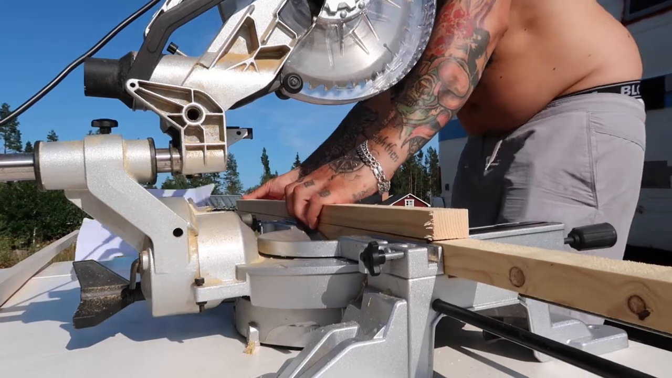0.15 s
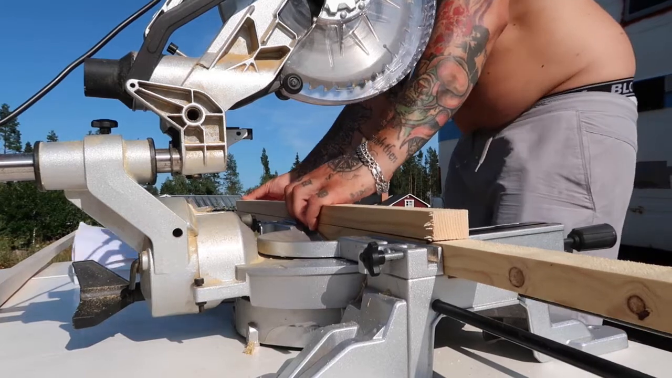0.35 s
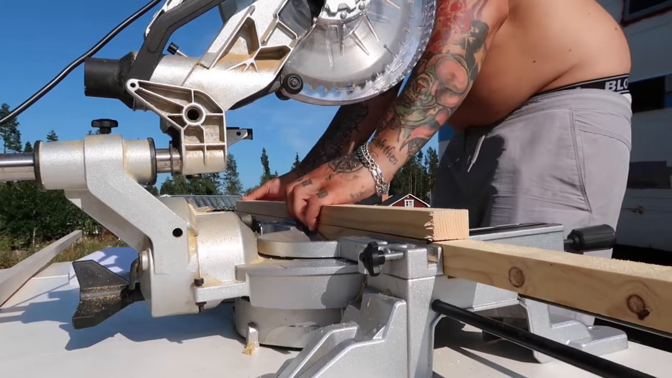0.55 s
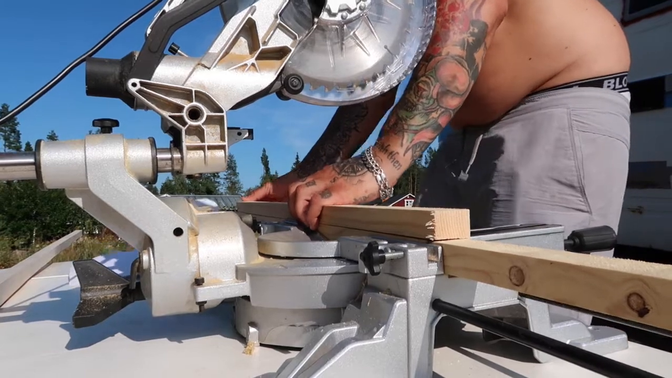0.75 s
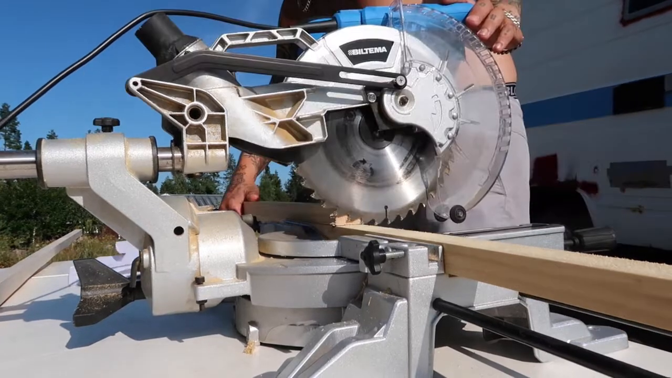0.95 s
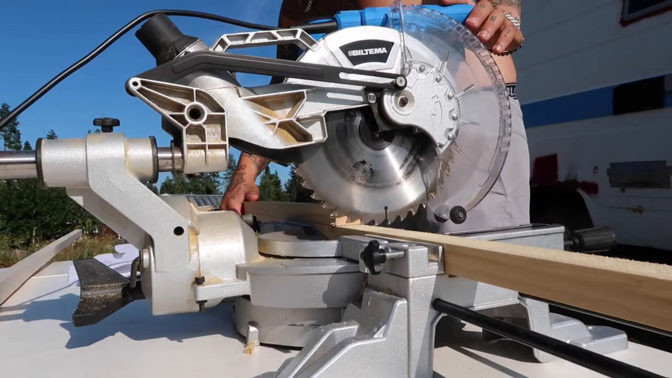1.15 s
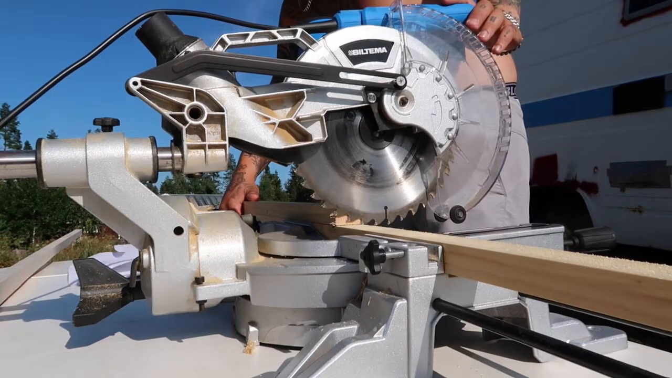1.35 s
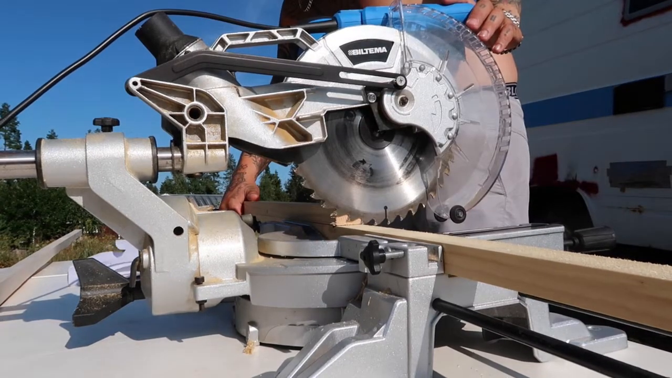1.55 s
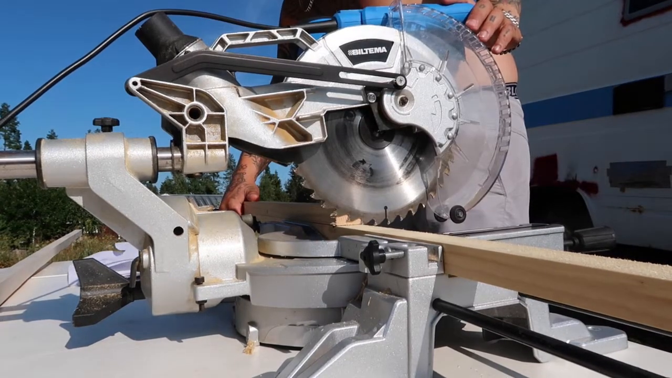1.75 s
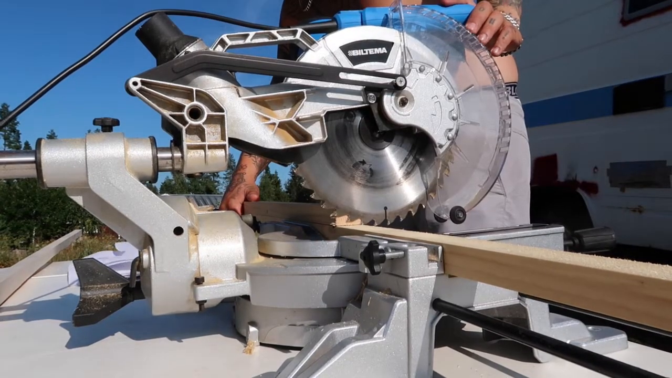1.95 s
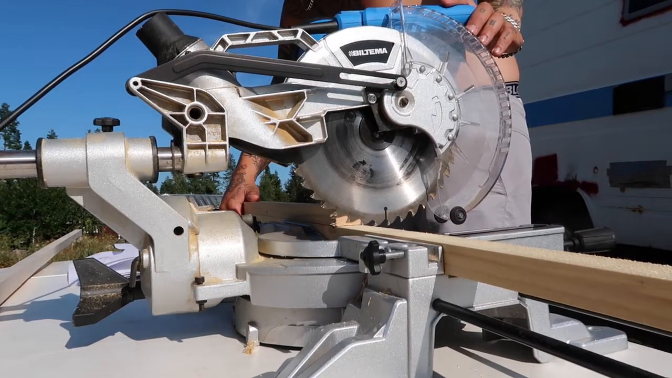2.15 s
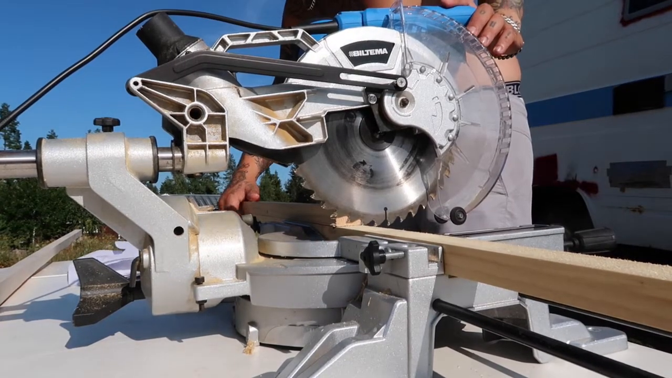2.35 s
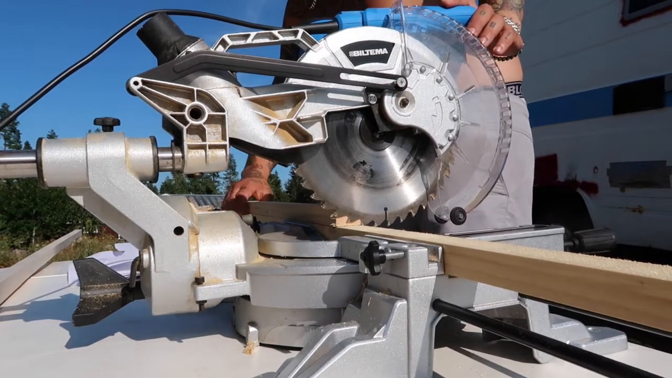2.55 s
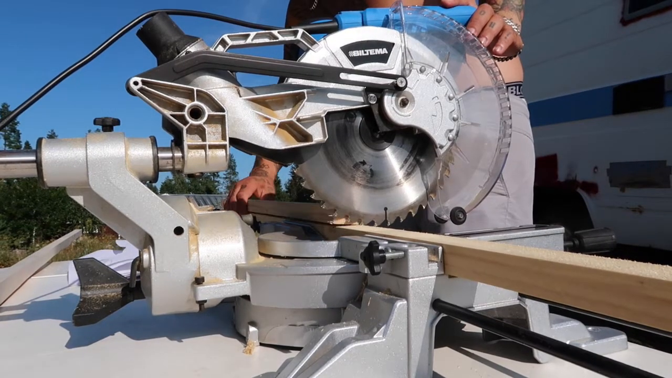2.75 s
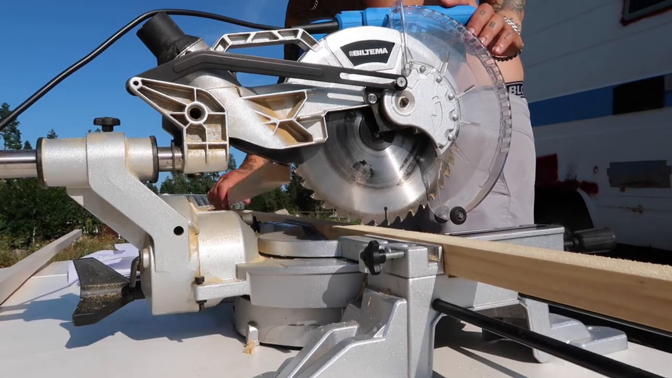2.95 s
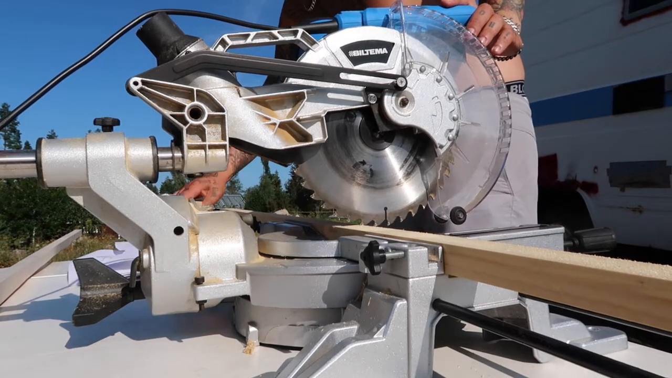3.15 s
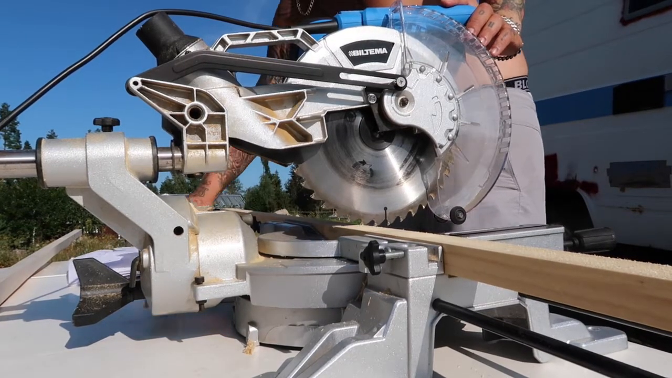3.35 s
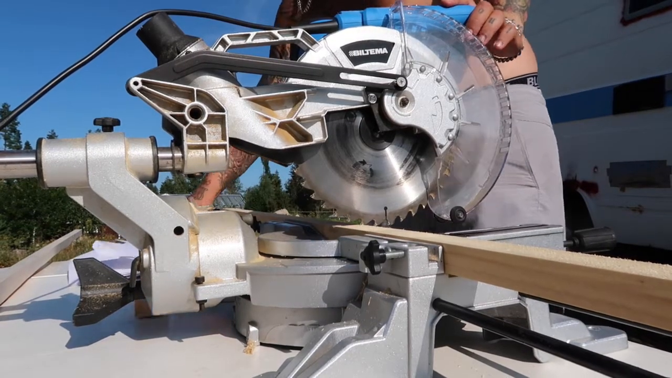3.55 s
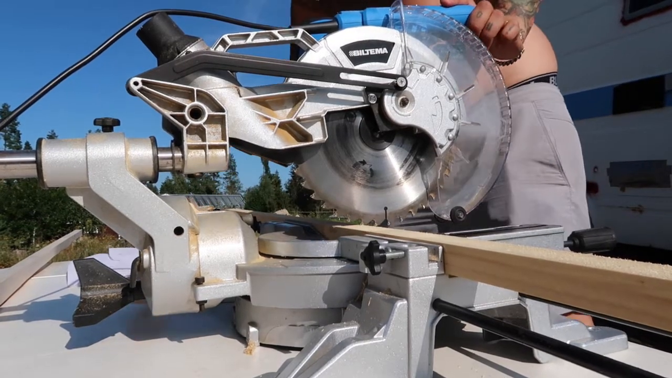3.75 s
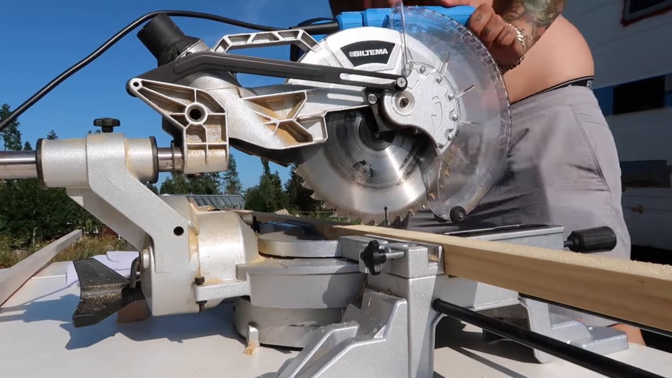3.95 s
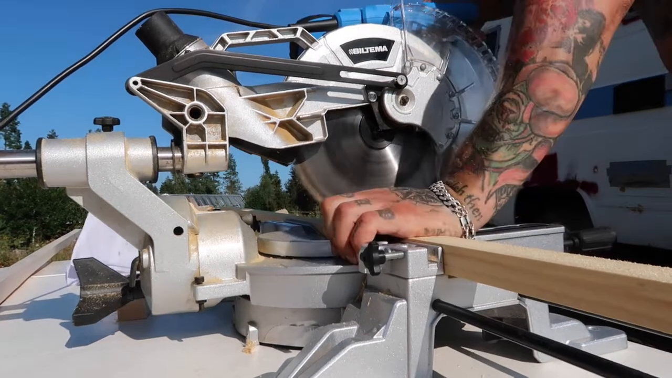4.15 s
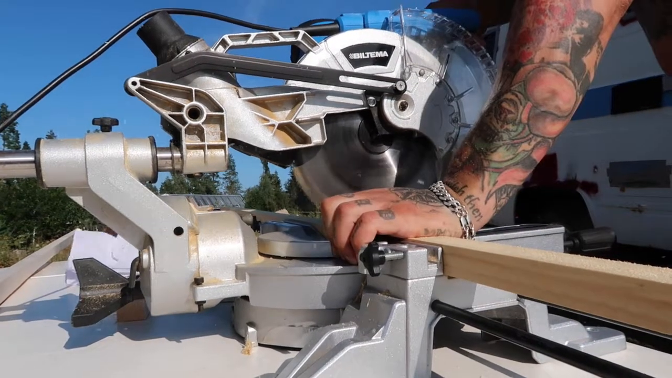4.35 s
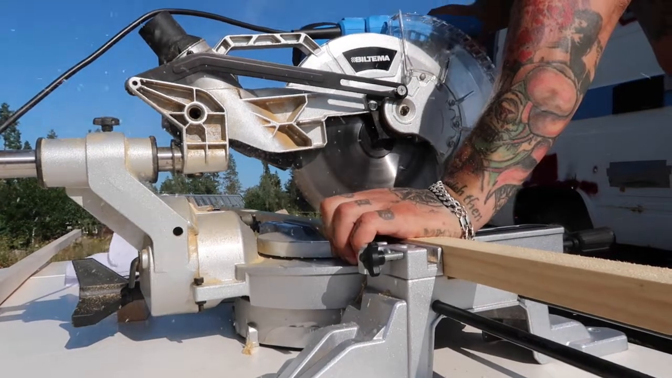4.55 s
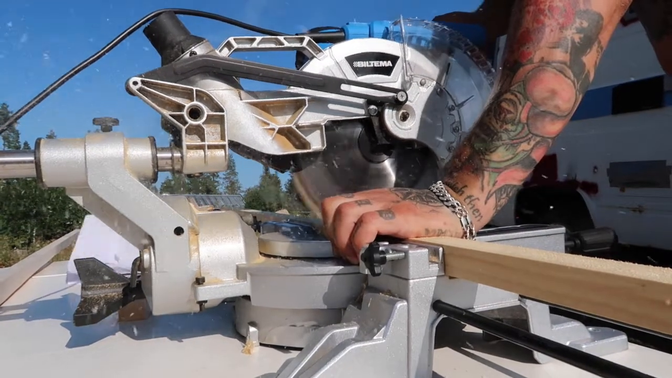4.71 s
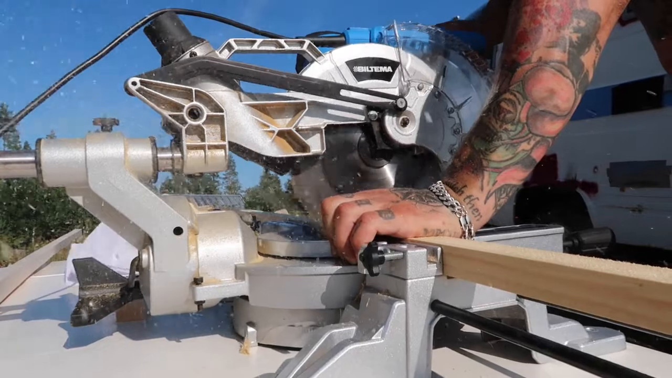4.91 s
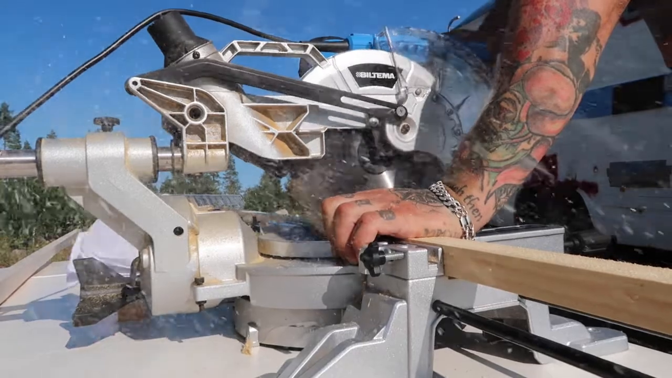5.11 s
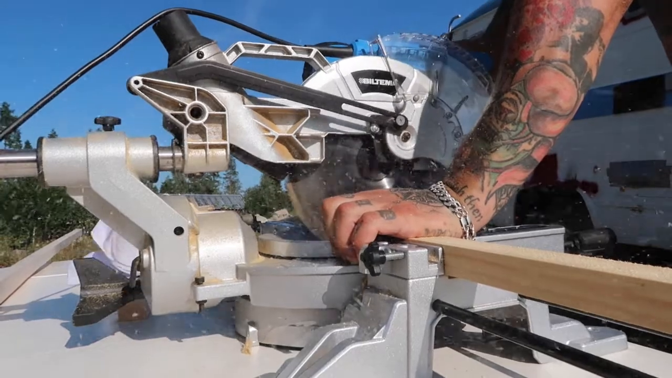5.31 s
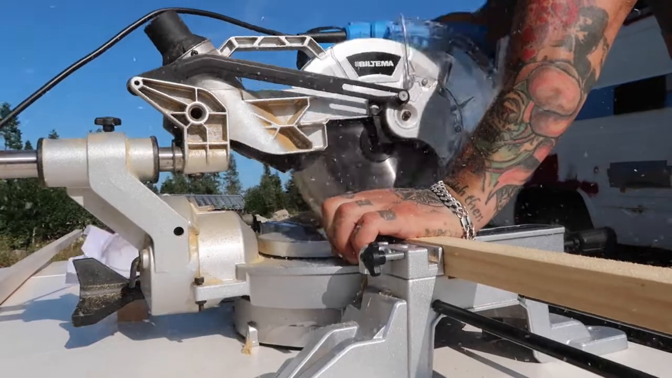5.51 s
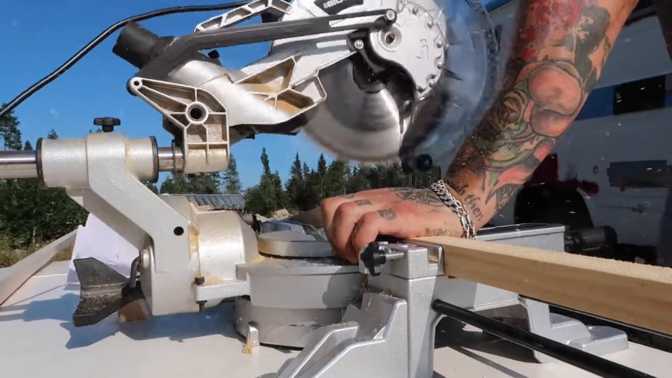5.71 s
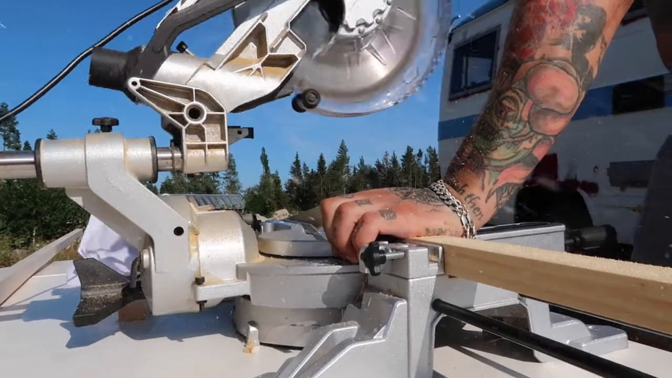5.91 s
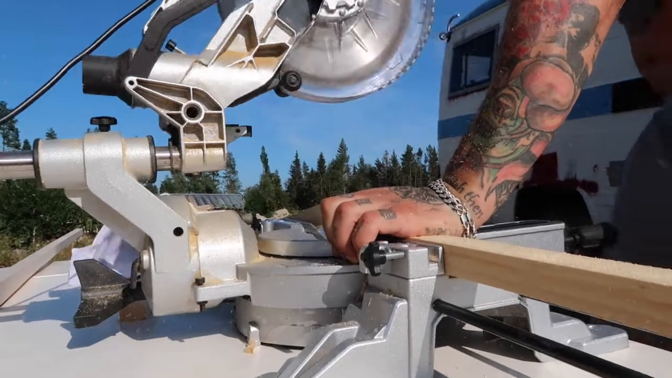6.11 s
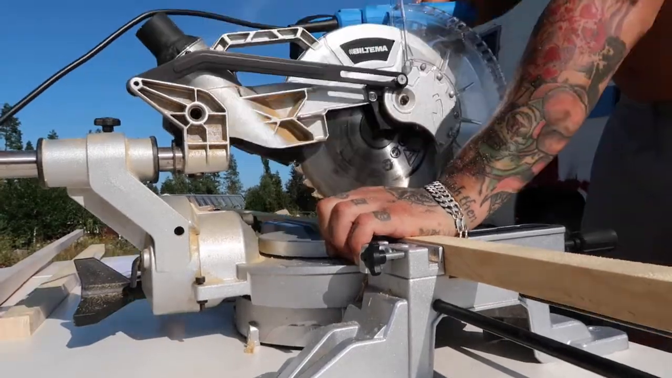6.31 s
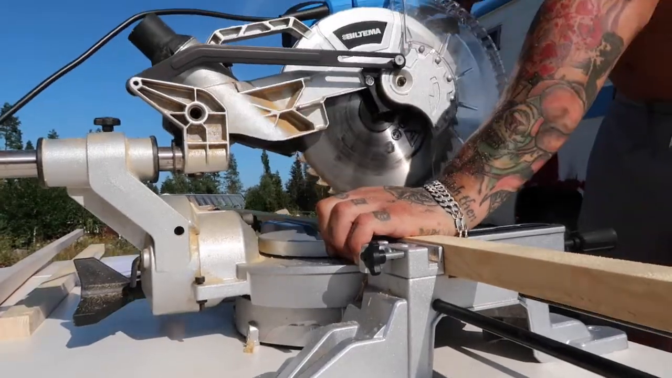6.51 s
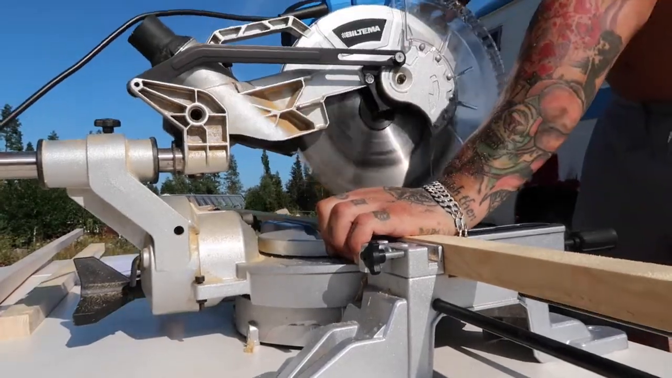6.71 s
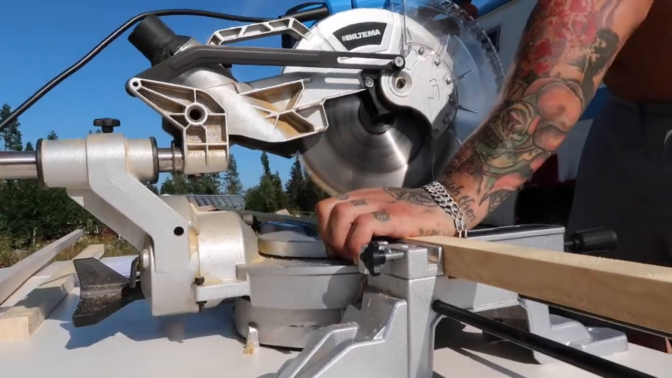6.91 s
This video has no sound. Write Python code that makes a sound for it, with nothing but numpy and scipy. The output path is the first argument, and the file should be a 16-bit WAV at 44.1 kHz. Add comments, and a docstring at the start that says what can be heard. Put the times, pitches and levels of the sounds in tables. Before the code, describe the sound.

Close outdoor stereo sound of a mitre saw. Low wind puffs and soft wood rubbing come first, with a brief scrape and scattered metal ticks. A board knocks and bounces on the ringing table. The saw bursts in already running, bites through wood and coasts downward, cut off abruptly. Handling rubs and ticks follow, then a hard trigger snap and a buzzing motor start.

```python
"""Outdoors beside a sliding mitre saw: low rumble and wind puffs on two microphone ports, a faint hush and a pip.
Wood rubs and scrapes, metal parts tick and a board knocks on a ringing saw table: friction noise and struck modes.
The saw enters already running, cuts through the board and coasts, ending abruptly while it still turns; its noise
and partials follow the armature. Then the trigger snaps and the motor spins up under a buzz of current pulses."""
import sys
import numpy as np
from scipy import signal
from scipy.fft import rfft, irfft, next_fast_len
from scipy.io import wavfile
from scipy.ndimage import uniform_filter1d, map_coordinates

SR = 44100
rng = np.random.default_rng(int(sys.argv[2]) if len(sys.argv) > 2 else 0)


def wrap_up_sound(samples):
    """Save the sound to the file named by the first command line argument, as 16-bit audio."""
    columns = np.atleast_2d(samples).T
    # keep every value between -1 and 1, then stretch to whole-number steps
    tamed = np.clip(columns, -1, 1)
    steps = np.round(tamed * 32767).astype(np.int16)
    wavfile.write(sys.argv[1], SR, steps)


N = 307288  # samples


def undb(db):
    """Level: a decibel value as an amplitude ratio."""
    return np.exp(np.asarray(db) * np.log(10) / 20)


def unit(x):
    """Normalisation: scale a signal to an rms value of one."""
    return x / np.sqrt(np.mean(x ** 2))


def lift(hz, resonances):
    """Resonance: summed gain in dB of bell-shaped (f/Hz, width/Hz, lift/dB) peaks."""
    return sum(d / (1 + (2 * (hz - c) / w) ** 2) for c, w, d in resonances)


def colour(x, points, lifts=(), lo_hz=1, hi_hz=SR / 2):
    """Linear filtering: shape by (f/Hz, level/dB) points and resonances, between two band edges."""
    size = next_fast_len(x.shape[-1])
    f = np.maximum(np.arange(size // 2 + 1) * SR / size, 1)
    hz, db = np.transpose(points)
    gain_db = np.interp(np.log(f), np.log(hz), db) + lift(f, lifts)
    edges = 1 / np.sqrt((1 + (lo_hz / f) ** 16) * (1 + (f / hi_hz) ** 16))
    return irfft(rfft(x, size) * undb(gain_db) * edges, size)[..., :x.shape[-1]]


def curve(table):
    """Interpolation: table columns on the sample grid, and a gate open while the table lasts."""
    s, *columns = np.transpose(table)
    t = np.arange(N) / SR
    gate = uniform_filter1d(1. * ((t >= s[0]) & (t <= s[-1])), size=88)
    return [np.interp(t, s, c) for c in columns], gate


def walk(rate):
    """Random modulation: levels held 1 / rate s and slewed twice; spread near 1."""
    k = int(SR / rate)
    held = np.repeat(rng.standard_normal(N // k + 1), k)
    return 1.33 * uniform_filter1d(uniform_filter1d(held, k), k)[:N]


def swell(spans):
    """Resonance crossing: lift in dB over (from, to, start dB, end dB) spans with soft edges."""
    t = np.arange(N) / SR
    lifts = (((t > a) & (t < b)) * np.interp(t, [a, b], [a_db, b_db]) for a, b, a_db, b_db in spans)
    return uniform_filter1d(sum(lifts), size=600)


def rasp(turns, renew_rate):
    """Cyclic repetition: a noise pattern recurs every turn and slowly renews itself."""
    patterns = rng.standard_normal((int(N / SR * renew_rate) + 2, 700))
    where = [np.arange(N) / SR * renew_rate, turns % 1 * 699]
    return unit(map_coordinates(patterns, where, order=1))


def tone(hz, db, waver_db, waver_rad, rate=40):
    """Amplitude and phase modulation: a sine partial whose size and phase waver."""
    phase = 2 * np.pi * np.cumsum(hz) / SR + waver_rad * walk(rate)
    return np.sqrt(2) * undb(db + waver_db * walk(rate)) * np.sin(phase)


def roar(db, low_db, sizzle_db, top_db, source, spectrum, lifts, patchy_db):
    """Source and resonator: fan air, brushes and teeth as rough noise ringing the housing, each band flickering."""
    rough = source * undb(1.0 * walk(300))
    ranges = [  # band edges/Hz, share/dB
        ([30, 420], -22 + .6 * low_db),
        ([420, 750, 1200], low_db),
        ([1200, 1700, 2200, 2700, 3400, 4300, 5200, 6000], 0),
        ([6000, 7800, 10500], sizzle_db),
        ([10500, 16000], top_db)]
    out = 0
    for edges, share_db in ranges:
        parts = (colour(rough, spectrum, lifts, lo, hi) * undb(patchy_db * walk(45))
                 for lo, hi in zip(edges, edges[1:]))
        out = out + unit(sum(parts)) * undb(share_db)
    return undb(db) * out


def blows(events, modes, push_s, click, tail, crack_hz, crack_share, dull_hz, soften, rise_s=1e-4):
    """Modal excitation: a click and a short rough push drive the modes, with a brighter crack and rattling tail."""
    out, t = np.zeros(N + SR), np.arange(SR // 3) / SR
    for s, db, treble_db, t60 in events:
        noise = rng.standard_normal((2, len(t)))
        fade = np.exp(-np.log(1000) * t / max(t60, .01))
        # loose parts chatter in the tail
        chatter = undb(5 * np.repeat(rng.standard_normal(len(t) // 150 + 1), 150)[:len(t)])
        push = click * (t == 0) + noise[0] * (np.exp(-t / push_s) + tail * fade * chatter)
        ring = 0
        for hz, width, mode_db in modes:
            mode = signal.lfilter(*signal.iirpeak(hz, hz / width, SR), push)
            ring = ring + undb(mode_db) / np.sqrt(width) * mode
        crack_band = signal.butter(3, crack_hz, "band", fs=SR, output="sos")
        crack = signal.sosfilt(crack_band, noise[1] * chatter * fade ** (1 / crack_share))
        hit = ring / np.abs(ring).max() + undb(treble_db) * crack / np.abs(crack).max()
        hit = hit * (1 - np.exp(-(t + 1 / SR) / rise_s))
        # softer contact, duller sound
        dull = signal.butter(2, dull_hz * undb(soften * treble_db), fs=SR, output="sos")
        out[int(s * SR):][:len(t)] += undb(db) * signal.sosfilt(dull, hit)
    return out[:N]


# low rumble, rising and falling: wind, and thumps under the knocks: t/s, level/dB
RUMBLE_LEVEL = [(0.0, -42), (0.06, -21), (0.31, -44), (1.15, -45), (1.8, -53), (2.0, -42.5), (2.55, -51),
                (2.95, -32.5), (3.1, -40), (3.3, -46.5), (3.46, -13.5), (3.57, -46), (3.62, -16.5),
                (3.84, -33), (3.9, -31), (4.0, -27), (4.06, -48.5), (4.6, -38.5), (5.9, -54.5), (6.19, -30),
                (6.4, -43), (6.66, -35.5), (6.97, -63)]
# rumble spectrum: f/Hz, relative level/dB
RUMBLE_SPECTRUM = [(12, -47), (20, 8), (75, 0.5), (123, 1), (183, -3.5), (273, -10.5), (461, -16.5),
                   (532, -40), (900, -37), (1170, -63), (1980, -120)]
# wind puffs: t/s, nominal level/dB, starting f/Hz, left minus right level/dB
PUFFS = [(0.043, -9.5, 144, -7.5), (0.08, -24, 73, 15), (0.096, -11, 97, -6), (0.129, -25, 94, -1),
         (0.148, -20, 124, 5), (0.192, -12.5, 145, 2), (0.207, -14, 132, -2), (0.304, -19.5, 83, -9),
         (0.309, -17, 226, -7), (0.433, -27.5, 90, -1), (0.51, -24, 86, -3), (0.54, -13.5, 73, 12),
         (0.563, -15, 223, -15.5), (0.575, -12.5, 75, 9), (0.625, -20.5, 129, 3), (0.644, -14, 181, 0),
         (0.66, -12.5, 204, -2), (0.673, -8.5, 105, 2), (0.947, -26.5, 101, 1), (1.055, -30, 290, 9),
         (1.452, -34, 273, -7), (1.951, -30, 135, 5), (1.977, -21.5, 110, -3), (2.087, -24, 87, 0),
         (2.106, -17.5, 114, -6), (2.262, -27.5, 73.4, 0), (2.35, -36.5, 350, -5), (2.496, -16.5, 92, 2),
         (2.516, -23, 123, -11), (2.741, -28, 73, -2), (2.808, -26, 116, 4), (2.854, -16.5, 209, 8),
         (2.865, -17.5, 219, -4), (2.919, -21.5, 98, -5), (2.96, -14.5, 121, 0), (3.007, -16, 117, -3),
         (3.046, -18.5, 88, 5), (3.071, -23, 112, -2), (3.281, -15, 151, 2), (3.296, -17, 84.6, -2),
         (3.356, -20.5, 330, -9), (3.362, -22.5, 376, -3), (3.369, -17.5, 358, 16), (3.376, -22, 340, -2),
         (3.402, -12, 170, -3), (3.422, -14, 170, 3), (3.458, -28, 170, 2.5), (3.499, -17, 106, -2),
         (6.183, -21, 183, 15), (6.206, -26.5, 114, -3)]
# difference between the ports in rumble and puffs: f/Hz, side minus mid level/dB
WIND_SIDE = [(30, -16), (60, -23), (110, -8.5), (200, -4.5), (380, -1), (900, -9)]
PUFF_TURNS, PUFF_SETTLE_S = 0.75, 0.0064  # time scale of a puff: some swings and a little more


def rumble_and_puffs():
    """Turbulence: low noise rises and falls and eddies burst on the ports, the lowest bass most alike in both."""
    (db,), _ = curve(RUMBLE_LEVEL)
    uneven = rng.standard_normal((2, N)) * undb(3.16 * walk(25.14))
    out = unit(colour(uneven, RUMBLE_SPECTRUM)) * undb(db)
    t = np.arange(SR // 8) / SR
    lean_db = np.zeros(N)
    for s, puff_db, hz, pan_db in PUFFS:
        u = t / (PUFF_TURNS / hz + PUFF_SETTLE_S)
        turns = hz * t * (1 - 0.1 * u) + rng.random((2, 1))  # swings that slow down
        flutter = np.sin(2 * np.pi * 1.986 * turns) * np.exp(-u)  # quicker, at the start
        swing = np.sin(2 * np.pi * turns) + 0.41 * flutter
        envelope = 3.67 * u ** 1.32 * np.exp(-2.5 * u ** 2)
        out[:, int(s * SR):][:, :len(t)] += undb(puff_db) * envelope * swing
        lean_db[int(s * SR):][:len(t)] = pan_db / 2
    lean_db = uniform_filter1d(lean_db, size=400)
    side = colour(out[1], WIND_SIDE)
    return np.array([out[0] + side, out[0] - side]) * undb([lean_db, -lean_db])


# distant hush spectrum: f/Hz, relative level/dB
HUSH_SPECTRUM = [(120, -32.5), (200, -2), (545, -5.5), (690, -7), (784, -7.5), (1070, -11), (2960, -16),
                 (10400, -33), (12300, -44), (13400, -31), (15500, -66)]
HUSH_DB = -52  # before ducking
PIP_HZ, PIP_RATE_HZ, PIP_DB = 13020, 25.05, -76.5  # a faint high tone that throbs


def yard(near):
    """Diffuse field and gain reduction: hush unrelated left and right, and a pip, both ducking after loud sounds."""
    hush = unit(colour(rng.standard_normal((2, N)), HUSH_SPECTRUM)) * undb(HUSH_DB + walk(6.3))
    t = np.arange(N) / SR
    throb = uniform_filter1d(1. * (np.sin(2 * np.pi * PIP_RATE_HZ * t + 2.9) > -.2), size=200)
    pip = np.sin(2 * np.pi * PIP_HZ * t) * throb
    hold = np.exp(-1 / (.35 * SR))  # power is averaged over .35 s
    loud = signal.lfilter([1 - hold], [1, -hold], near.mean(axis=0) ** 2)
    return (hush + undb(PIP_DB) * pip) * (1 + loud / undb(-50.0)) ** -.25


# pushes of wood on the table: t/s, peak level/dB, rise/s
RUBS = [(0, -46.5, 0.029), (.11, -48, 0.04), (.26, -53, 0.057), (.69, -47.5, 0.018), (.79, -47.5, 0.053),
        (1.4, -53.5, 0.055), (2.38, -55, 0.038), (2.72, -52.5, 0.038), (3.591, -32.5, 0.023),
        (3.79, -53, 0.037), (3.87, -57, 0.1), (6.169, -38.5, 0.017), (6.23, -40.5, 0.031),
        (6.4, -52, 0.056), (6.539, -37.5, 0.012), (6.691, -31, 0.049)]
# rubbing spectrum: f/Hz, relative level/dB
RUB_SPECTRUM = [(290, -11), (500, 1.5), (990, -2.5), (1270, -2), (1440, 0.5), (1910, -2), (3940, -11.5),
                (5900, -26.5), (14000, -57)]
# a bright scrape, cut off abruptly: t/s, level/dB
SCRAPE = [(.748, -42), (.768, -34.5), (.778, -30), (.791, -36), (.795, -26.5), (.7985, -21)]
# scrape spectrum: f/Hz, relative level/dB
SCRAPE_SPECTRUM = [(300, -10), (700, -3.5), (1150, -11), (1500, 0.5), (2500, -1.5), (3300, 2), (4600, -1),
                   (5800, -22), (7000, -19), (10000, -40), (15000, -42)]


def rubbing():
    """Friction: grainy noise of wood on the saw table, each push swelling and dying away, and the scrape."""
    noise = rng.standard_normal((2, N))
    (scrape_db,), scraping = curve(SCRAPE)
    pushes = 0
    for s, db, rise in RUBS:
        u = np.maximum(np.arange(N) / SR - s, 0) / rise
        pushes = pushes + undb(db) * u * np.exp(1 - u)
    rub = unit(colour(noise[0] * undb(2.0 * walk(150)), RUB_SPECTRUM)) * pushes
    scrape = unit(colour(noise[1] * undb(2 * walk(500)), SCRAPE_SPECTRUM))
    return rub + scrape * undb(scrape_db) * scraping


# metal ticks: t/s, level/dB, 60 dB decay of the tail/s
TICKS = [(1.061, -21, 0.14), (1.092, -24.5, 0.086), (1.113, -27.5, 0.12), (1.268, -33.5, 0.09),
         (2.054, -18.5, 0.11), (2.089, -31, 0.08), (2.146, -22.5, 0.16), (2.215, -25, 0.082),
         (2.265, -24, 0.2), (2.349, -33.5, 0.084), (2.402, -18.5, 0.12), (2.441, -31, 0.047),
         (3.799, -39, 0.087), (6.228, -22, 0.16), (6.269, -25, 0.11), (6.312, -37, 0.08),
         (6.361, -29, 0.39), (6.42, -20, 0.14), (6.439, -36, 0.08), (6.498, -33, 0.073),
         (6.541, -8.5, 0.021), (6.658, -20.5, 0.072), (6.687, -43, 0.07)]
# modes of the metal parts: f/Hz, width/Hz, relative level/dB
METAL_MODES = [(1010, 110, 16.5), (1653, 99, 18.5), (1880, 75, 17), (2130, 110, 18), (2550, 190, 16),
               (3040, 140, 8.5), (3490, 190, 14), (3880, 310, -3)]


def metal_ticks():
    """Impact: small metal parts ring in their own modes."""
    treble_db = -17
    events = [(s, db, treble_db, t60) for s, db, t60 in TICKS]
    return blows(events, METAL_MODES, push_s=0.0034, click=2.5, tail=0.3, crack_hz=[2800, 5200],
                 crack_share=0.16, dull_hz=3060, soften=0, rise_s=.0015)


# board knocks and bounces: t/s, level/dB, treble share level/dB, table ring level/dB
KNOCKS = [(3.437, -6.5, -30.5, -4), (3.456, -18, -34, -12), (3.604, -3.5, -11.5, -15),
          (3.615, -9.5, -3, -16), (3.64, -12, -16, -1), (3.665, -11, -9, 4), (3.679, -16, -40, 2),
          (3.706, -25, -7.5, -12), (3.715, -15, -25, -4), (3.733, -26, -2.5, -12), (3.742, -13, -22.5, -18),
          (3.869, -2.5, -13, -5.5), (3.874, -6, -21, -3), (3.891, -19, -15, 0), (3.897, -29, -25, -5),
          (3.923, -24, -10, 1), (3.946, -26, -30, -2), (3.964, -34, -7, -1), (3.974, -18, -33, -5),
          (3.988, -14, -34, -9), (4.004, -18.5, -29, -3), (4.023, -25, -28, -10), (5.977, -14, 6.5, -20)]
# modes of the board: f/Hz, width/Hz, relative level/dB
BOARD_MODES = [(141, 32, 11), (204, 50, 23), (293, 66, 29.5), (456, 24, -5), (600, 110, 6.5),
               (813, 18, 8.5), (855, 59, -14), (1230, 80, -3), (1430, 67, -1), (1900, 70, -7),
               (2140, 440, 11.5), (2530, 130, 8)]


def board_knocks():
    """Impact: the board is knocked against the fence and bounces; less treble means a softer, duller contact."""
    decay_s = 0.3
    events = [(*knock[:3], decay_s) for knock in KNOCKS]
    return blows(events, BOARD_MODES, push_s=0.0071, click=7.3, tail=0.23, crack_hz=[700, 3500],
                 crack_share=0.22, dull_hz=4300, soften=0.44)


# modes of the metal saw table: f/Hz, level re knock plus ring/dB, 60 dB decay/s
TABLE_MODES = [(204.6, -17.5, 0.35), (610, -19.5, 0.27), (1130, -29.5, 0.24), (1467, -33, .2),
               (1830, -35, .1), (3100, -44, 0.26), (3030, -40, .25)]


def table_ring():
    """Free vibration: every knock leaves the saw table ringing in decaying sines."""
    t, out = np.arange(SR // 2) / SR, np.zeros(N + SR)
    for s, knock_db, _, ring_db in KNOCKS:
        spot_db = 1.5 * rng.standard_normal(len(TABLE_MODES))  # each knock lands on another spot
        ring = 0
        for (hz, mode_db, t60), d in zip(TABLE_MODES, spot_db):
            decay = np.exp(-np.log(1000) * t / t60)
            ring = ring + undb(knock_db + ring_db + mode_db + d) * np.sin(2 * np.pi * hz * t) * decay
        out[int(s * SR):][:len(t)] += ring
    return out[:N] * undb(3 * np.tanh(walk(83)))  # the loose board chatters on the table


# gear rattle bands: multiple of the armature speed, width/Hz, relative level/dB
RATTLE = [(7, 260, -4), (14, 330, 1)]


def gear_rattle(turns, shake):
    """Backlash: phase noise broadens the mesh partials, flaring with blade wobble and drive beats."""
    out = 0
    for multiple, width_hz, db in RATTLE:
        flare = np.exp(1.5 * shake) * undb(2 * np.tanh(walk(36)))
        slow = signal.lfilter(*signal.butter(2, width_hz / 2, fs=SR), rng.standard_normal((2, N)))
        phase = 2 * np.pi * np.round(multiple) * turns + np.arctan2(*slow)
        out = out + undb(db) * unit(flare) * np.sqrt(2) * np.sin(phase)
    return undb(-29) * out


# running saw: t/s, roar level/dB
RUN = [(4.04, -22.5), (4.07, -16.5), (4.13, -20.5), (4.23, -16), (4.45, -18), (4.66, -17.5), (4.79, -18),
       (5.09, -20.5), (5.2, -19.5), (5.35, -19), (5.47, -18.5), (5.7, -20.5), (5.92, -18), (6.05, -20),
       (6.178, -20.5)]
# armature speed: t/s, f/Hz
SPEED = [(4.04, 328), (4.1, 333.5), (4.2, 340.5), (4.27, 345.5), (4.45, 347.6), (4.66, 347.5),
         (4.79, 345.7), (5.09, 345.9), (5.2, 349.8), (5.35, 356.7), (5.49, 358), (5.61, 346), (5.79, 329),
         (5.91, 318.3), (6.09, 303.2), (6.178, 296.3)]
# t/s at which the teeth touch the wood, bite fully, start to break through, run free
CUT_S = [4.452, 4.75, 5.05, 5.3]
# roar spectrum: f/Hz, relative level/dB
ROAR_SPECTRUM = [(24, -57), (40, -14), (136, 45), (273, 24), (350, 3.5), (387, -4.5), (522, -5.5),
                 (999, -6), (2450, 4), (4690, -8.5), (6490, -27.5), (8330, -38.5), (10200, -66),
                 (12400, -57.5), (15500, -64)]
# housing resonances: f/Hz, width/Hz, lift level/dB
HOUSING = [(1978, 51, 3.5), (2040, 37, 1), (2430, 610, -4), (3203, 24, 5.5), (3522, 54, 6),
           (3785, 110, 2.5), (4540, 130, 3.5), (5270, 91, 2.5), (6900, 73, 9)]
# partials by name: free-running level/dB, then lifts in the cut, in the jolt and while coasting, each level/dB
PARTIALS = {"unbalance": (-35, 0, 4, -4), "mesh": (-33.5, 7.5, 17.5, 2), "slots": (-46, 13, 0, 2.5),
            "sideband": (-48.5, -8, 2, 9), "mesh x2": (-48, 6, 12, 0), "mesh x3": (-45.5, 0, -12, 1),
            "bars": (-51.5, 4, 2, -2)}
# frequency of each named partial as a multiple of the armature speed
MULTIPLES = {"unbalance": 1, "mesh": 7, "teeth": 40 * 7 / 34, "slots": 12, "sideband": 13, "mesh x2": 14,
             "mesh x3": 21, "bars": 24}
# partials crossing housing resonances: from t/s, to t/s, lift at start level/dB, lift at end level/dB
SINGS = {"mesh": [(5.53, 5.76, 7, 6), (5.86, 5.92, 11, 8)], "slots": [(4.03, 4.27, 20, 14),
         (5.72, 5.96, 23, 14.5)], "sideband": [(5.48, 5.6, 17.5, 12.5), (5.65, 5.75, 13, 9),
         (5.81, 5.87, 11, 6), (5.93, 6.05, 6, 9), (6.065, 6.19, 14.5, 6)],
         "mesh x3": [(6.05, 6.14, 10, 13)], "bars": [(5.57, 5.66, 10, 10), (5.81, 5.87, 5, 4),
         (6.07, 6.19, 9, 11)]}
# bite of the teeth in the wood: t/s, level/dB
BITE = [(4.45, -52), (4.57, -28), (4.68, -27), (4.78, -21), (4.97, -20.5), (5.1, -22.5), (5.2, -29),
        (5.3, -34)]
BLADE_TURNS, TEETH, MAINS_HZ = 7 / 34, 40, 50  # blade turns per armature turn; teeth; mains
POWER_OFF_S, JOLT_S = 5.48, .16  # the gears slap over when the power drops and settle in this time
LOW_DB, SIZZLE_DB, TOP_DB = -14, -23, -25  # shares of the roar, the last two before cut and coast


def saw():
    """Rotating machinery: the cut and run-down, with roar and partials locked to the armature."""
    ((roar_db,), gate), ((hz,), _) = curve(RUN), curve(SPEED)
    t, turns = np.arange(N) / SR, np.cumsum(hz) / SR
    blade = BLADE_TURNS * turns
    load = np.interp(t, CUT_S, [0, 1, 1, 0])
    coast_s = np.maximum(t - POWER_OFF_S, 0)
    coasting = t >= POWER_OFF_S
    jolt = coasting * np.exp(-coast_s / JOLT_S)
    wobble = np.sin(2 * np.pi * blade + 0.32 * walk(3.04))  # the blade runs slightly out of true
    # while powered: a slow gear beat every seven armature turns, and torque pulses at twice the mains
    drive = np.sin(2 * np.pi * turns / 7) + 0.23 * np.sin(4 * np.pi * MAINS_HZ * t)
    drive = (t < POWER_OFF_S) * drive
    throb = 1 + 0.047 * np.sin(2 * np.pi * turns) + 0.022 * wobble + 0.025 * drive
    source = (rng.standard_normal(N) + .8 * rasp(blade, 11.0)) * throb
    # a fixed roughness pattern, one level per tooth, repeats every blade turn
    roughness_db = 2.5 * rng.standard_normal(TEETH)
    source = source * undb(roughness_db[(TEETH * blade).astype(int) % TEETH])
    # the unloaded gears beat deeper with the blade
    mesh_beat = 0.48 + np.where(coasting, .75, 0.44) * wobble + 1.03 * drive
    whine = 0
    for name, (db, cut_db, jolt_db, coast_db) in PARTIALS.items():
        partial_hz = MULTIPLES[name] * hz
        db = db + cut_db * load + jolt_db * jolt + coasting * coast_db
        if name in SINGS:
            db = db + swell(SINGS[name])
        if "mesh" in name:
            whine = whine + tone(partial_hz, db, waver_db=1.5, waver_rad=.5) * mesh_beat
        else:
            whine = whine + tone(partial_hz, db, waver_db=1.6, waver_rad=.4) * (1 + .4 * wobble)
    (bite_db,), biting = curve(BITE)
    bite = biting * tone(MULTIPLES["teeth"] * hz, bite_db, 0.39, .2, 25.2)
    rattle = ~coasting * gear_rattle(turns, 0.31 * wobble + 0.63 * drive)
    # coasting, the sizzle gains and the top loses 13 dB per s in their shares
    sizzle_db = SIZZLE_DB + 13 * coast_s
    top_db = TOP_DB + 4 * load - 13 * coast_s
    rush = roar(roar_db + 2 * jolt, LOW_DB, sizzle_db, top_db, source, ROAR_SPECTRUM, HOUSING, 1.87)
    return gate * (rush + whine + bite + rattle)


# trigger snap, with a faint noise leading into it: t/s, level/dB, treble share level/dB, 60 dB decay of the tail/s
SNAP = [(6.706, -28, -28, 0.04), (6.714, -18, 13.5, 0.52), (6.722, 15.5, -37, 0.039)]
# modes of the trigger: f/Hz, width/Hz, relative level/dB
TRIGGER_MODES = [(880, 190, 4), (1385, 200, 8), (2360, 450, 6), (3200, 510, -14)]


def trigger_snap():
    """Impact: the trigger snap rings its modes, with a faint noise leading into it."""
    return blows(SNAP, TRIGGER_MODES, push_s=0.0042, click=8.8, tail=0.42, crack_hz=[3500, 14000],
                 crack_share=1.0, dull_hz=3800, soften=0)


# spin-up: t/s, roar level/dB, slot whine level/dB
SPIN = [(6.735, -31, -47), (6.77, -19.5, -30), (6.79, -18.5, -39), (6.802, -19, -33), (6.81, -18, -18),
        (6.825, -16, -17.5), (6.84, -18.5, -17), (6.852, -18, -23), (6.865, -18, -36), (6.89, -17, -44),
        (6.91, -18.5, -24), (6.968, -16.5, -23)]
# spin-up armature speed: t/s, f/Hz
SPIN_SPEED = [(6.735, 39), (6.77, 62), (6.79, 125), (6.81, 157), (6.826, 161), (6.84, 179), (6.852, 184),
              (6.89, 228), (6.91, 247), (6.968, 258)]
# current buzz: f/Hz, relative level/dB
BUZZ = [(100, 4.5), (200, 2), (300, -2), (400, -12), (500, -28), (600, -8), (700, -11), (800, 0),
        (900, -13), (1100, -14), (1200, -5), (1300, -20)]
# resonance met by the lower octave of the slot whine: f/Hz, width/Hz, lift level/dB
HALF_SINGS = [(1460, 290, 23)]
# starting roar spectrum: f/Hz, relative level/dB
START_SPECTRUM = [(24, -65), (40, -37), (96, -24), (136, 47), (461, -14.5), (779, -14), (927, -18),
                  (2110, 0), (6990, -25), (10200, -37), (11000, -49), (14100, -16), (15500, -95)]
# housing resonances at the start: f/Hz, width/Hz, lift level/dB
START_HOUSING = [(825, 150, 5.5), (1550, 390, 6.5), (2500, 110, 6), (2950, 440, 8), (3930, 260, 10),
                 (4870, 400, 9), (6960, 230, 4)]


def spin_up():
    """Electromagnetic forcing: inrush current buzzes at twice the mains rate and chops the climbing whine."""
    ((roar_db, slots_db), gate), ((hz,), _) = curve(SPIN), curve(SPIN_SPEED)
    t = np.arange(N) / SR
    pulse_hz = 2 * MAINS_HZ
    throb = 1 + 0.12 * np.sin(2 * np.pi * pulse_hz * t)
    buzz_db = -28 - 49 * np.maximum(t - SPIN[0][0], 0)  # fades by 49 dB per s
    buzz = sum(tone(np.full(N, f), buzz_db + db, 2.2, .45, 60) for f, db in BUZZ)
    whine = tone(12 * hz, slots_db, 1.5, .5, 100)  # twelve slots a turn
    half = tone(6 * hz, -49 + lift(6 * hz, HALF_SINGS), 2.5, .9, 120)
    # once a blade turn, sharper on the lower octave
    beat = 1 + .4 * np.sin(2 * np.pi * BLADE_TURNS * np.cumsum(hz * gate) / SR + 0.92)
    growl = 0.9 * rasp(pulse_hz * t, 25.0)  # repeats with each current pulse
    source = (rng.standard_normal(N) + growl) * throb
    # the roar brightens with speed
    low_db, sizzle_db, top_db = 12 - 0.0881 * hz, -30 + 0.0591 * hz, -42
    rush = roar(roar_db, low_db, sizzle_db, top_db, source, START_SPECTRUM, START_HOUSING, 0.57)
    return gate * (rush + buzz + throb * (beat * whine + beat ** 3 * half))


def ports(mono, side_db):
    """Reflection: nearby surfaces send a smeared copy that differs between the two ports."""
    smear = rng.standard_normal(2048) * np.exp(-np.arange(2048) / 500)
    copy = signal.fftconvolve(mono, smear / np.linalg.norm(smear))[:N]
    side = colour(copy, side_db) * (1 + .6 * walk(60))
    return mono + side * np.array([[1], [-1]])


# difference between the ports for the motor and trigger: f/Hz, side minus mid level/dB
SAW_SIDE = [(60, -7), (110, -46), (200, -47), (380, -42), (700, -31.5), (1290, -46), (2380, -24.5),
            (4400, -9.5), (8120, -1.5), (11000, 8.5), (15000, -22)]
# the same for the board and saw table: f/Hz, side minus mid level/dB
KNOCK_SIDE = [(60, -13), (110, -19), (200, -25), (380, -31), (700, -30), (1290, -16), (2380, -17.5),
              (4400, -2), (8120, 1), (15000, 7)]
# the same for ticks and rubbing: f/Hz, side minus mid level/dB
NEAR_SIDE = [(60, 13), (110, -6), (200, -34), (380, -41), (700, -28), (1290, -22), (2380, -22.5),
             (4400, -5), (8120, 4), (15000, 8)]


def scene():
    """Superposition: the near sources reach the ports and add to rumble, puffs and yard."""
    near = ports(metal_ticks() + rubbing(), NEAR_SIDE)
    near = near + ports(board_knocks() + table_ring(), KNOCK_SIDE)
    near = near + ports(saw() + trigger_snap() + spin_up(), SAW_SIDE)
    return near + rumble_and_puffs() + yard(near)


def record(dry):
    """Band limiting and clipping: the microphone drops the deepest bass, the loudest peaks clip, the top is cut."""
    dry = signal.sosfilt(signal.butter(2, 55, "high", fs=SR, output="sos"), dry)
    low_pass = signal.ellip(8, .2, 70, 15700, fs=SR, output="sos")
    return signal.sosfilt(low_pass, np.clip(dry, -.92, .92))


dry = scene()
out = record(dry)
wrap_up_sound(out)
```